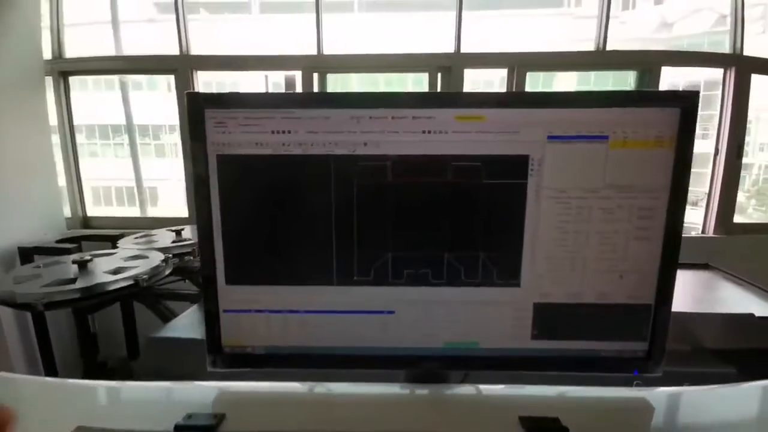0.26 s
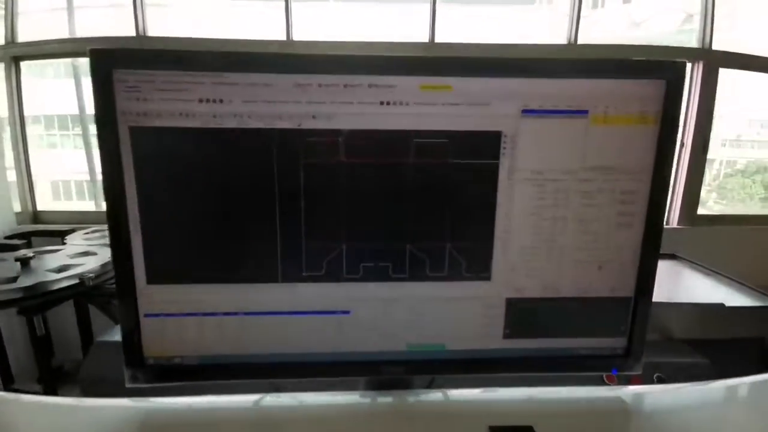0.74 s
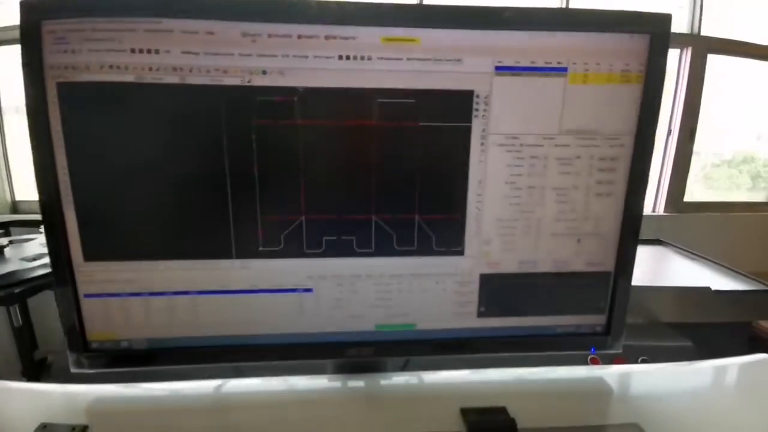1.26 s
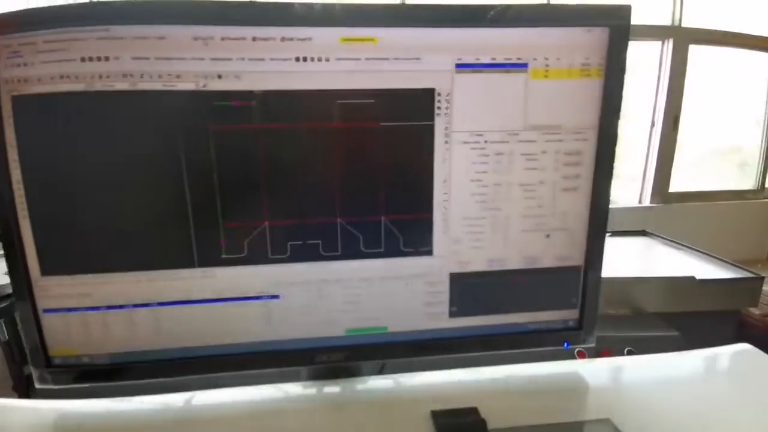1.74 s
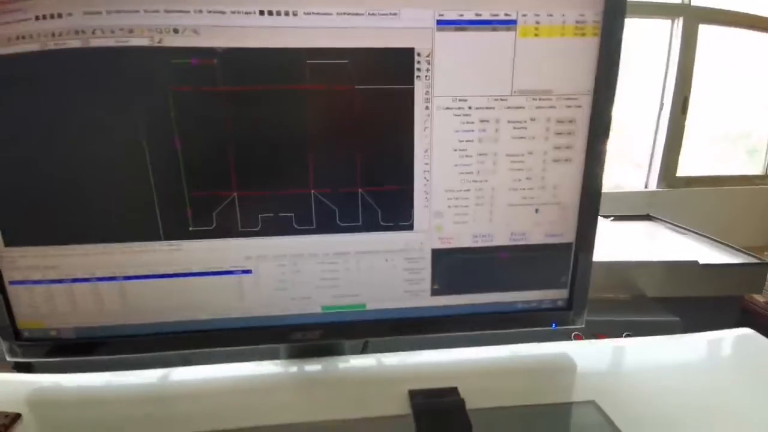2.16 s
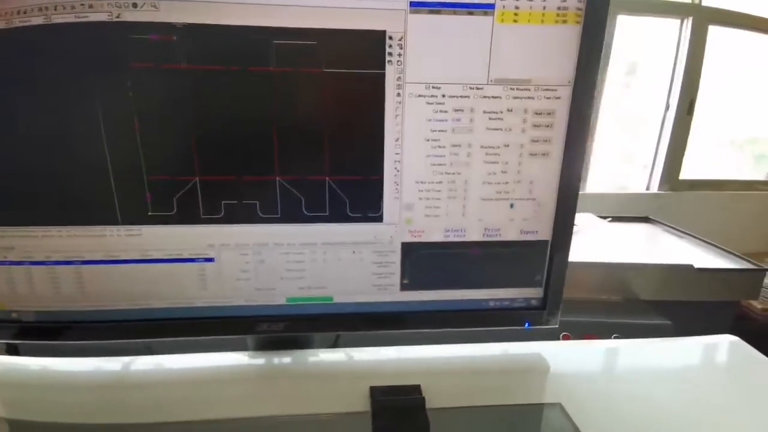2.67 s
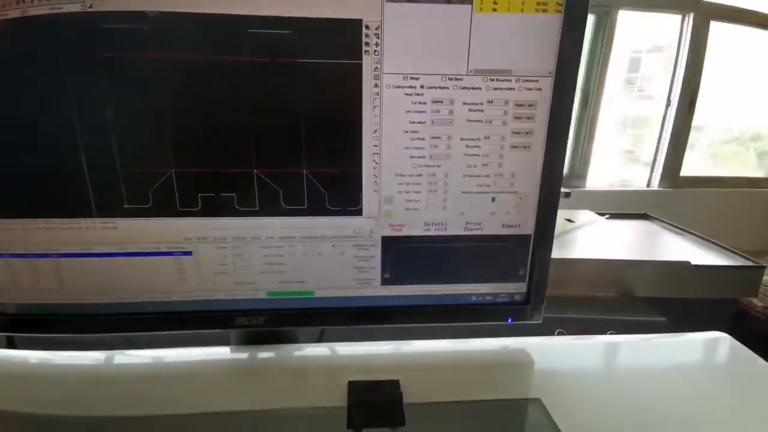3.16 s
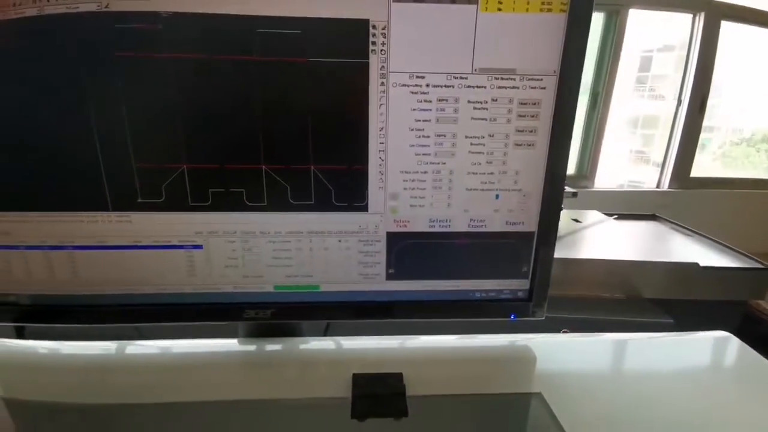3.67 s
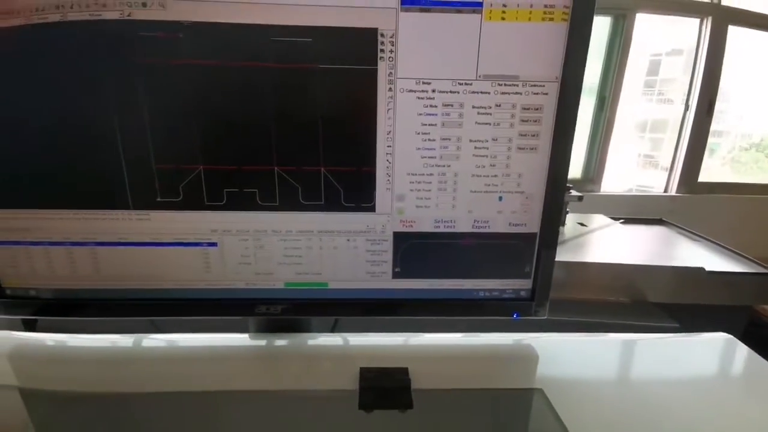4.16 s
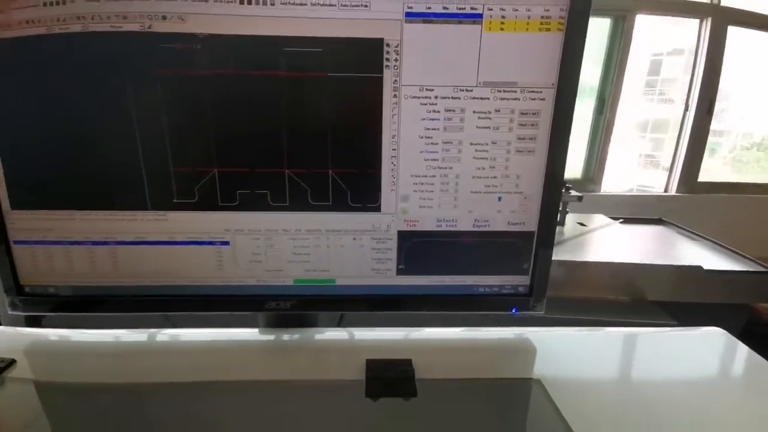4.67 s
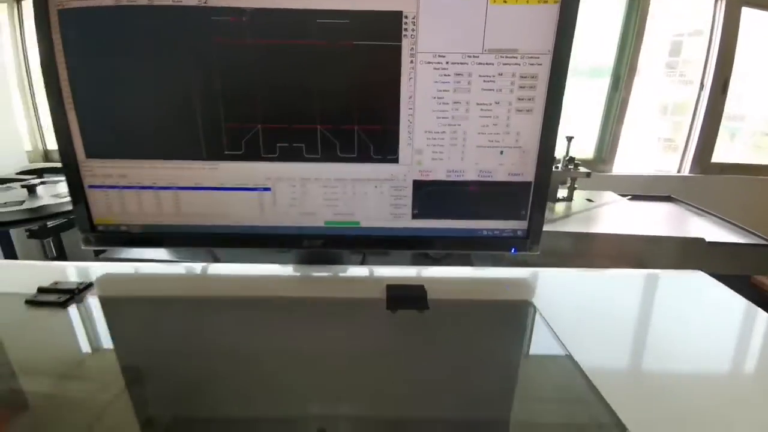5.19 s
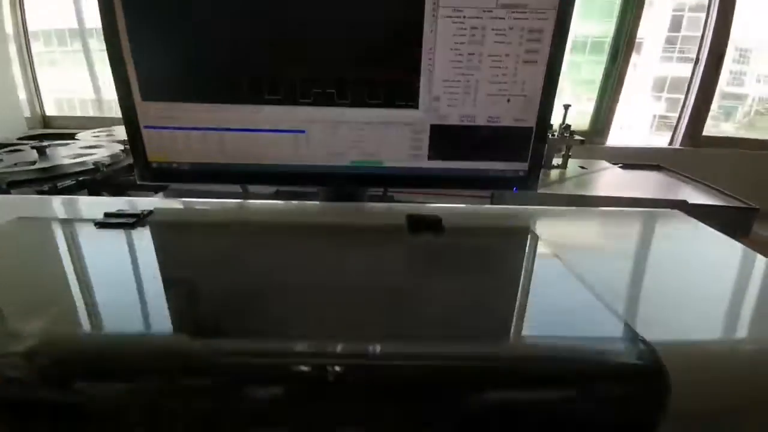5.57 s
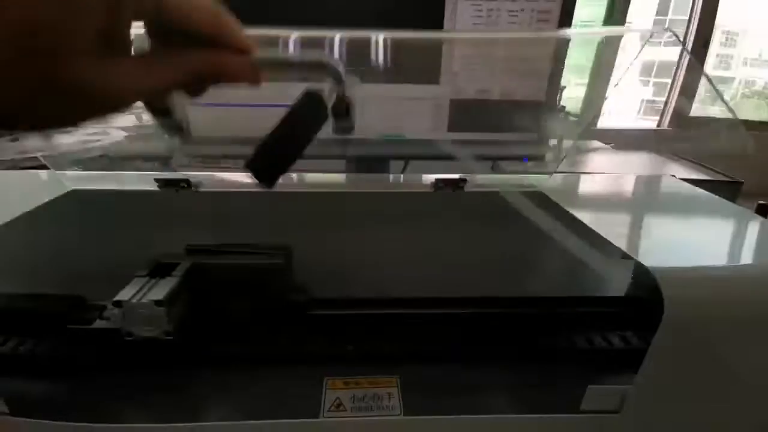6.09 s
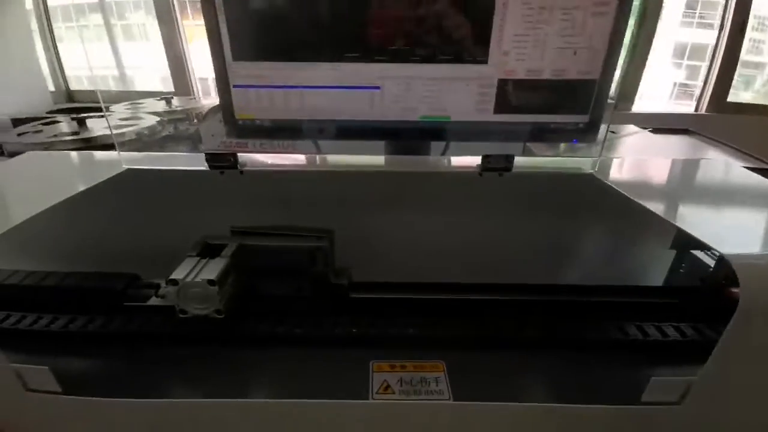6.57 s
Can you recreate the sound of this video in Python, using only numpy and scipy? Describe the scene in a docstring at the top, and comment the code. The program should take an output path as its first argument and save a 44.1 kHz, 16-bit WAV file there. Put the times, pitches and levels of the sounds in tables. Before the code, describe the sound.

An automatic metal bending machine hisses with bursts of compressed air, sharp clacks and thuds in an echoing workshop.

```python
"""An automatic rule bender cycles close by in a hard, echoing workshop.
Valves pop, cylinders thud and dies clack in turn: each blow is a strike and a short rattle that ring
the metal. Compressed air blows from a nozzle and exhausts and resonates in the housing. Servos whine
now and then, a cover bumps, and an uneven low rumble lies under the workshop's drone."""
import sys
import numpy as np
from scipy import signal
from scipy.fft import rfft, irfft
from scipy.io import wavfile
from scipy.ndimage import uniform_filter1d

SR = 44100
rng = np.random.default_rng(int(sys.argv[2]) if len(sys.argv) > 2 else 0)


def bounce(signal):
    """Save signal as a 16-bit WAV file at the path given by the first command-line argument."""
    frames = np.transpose(np.atleast_2d(signal))
    limited = np.clip(frames, -1, 1)
    pcm = np.round(limited * 32767).astype(np.int16)
    wavfile.write(sys.argv[1], SR, pcm)


N = 301203


def from_db(db):
    return 10 ** (np.asarray(db) / 20)


def unit_rms(x):
    return x / np.sqrt(np.mean(x ** 2) + 1e-20)


def gain_curve(rows):
    return from_db(np.interp(np.arange(N) / SR, *np.transpose(rows)))


def at_hz(points, hz):
    points_hz, values = np.transpose(points)
    return np.interp(np.log(hz), np.log(points_hz), values)


def drift(rate_hz):
    """Slow random wander, unit RMS."""
    r = np.exp(-80 * np.pi * rate_hz / SR)
    slow = signal.lfilter([1], [1, -2 * r, r * r], rng.standard_normal(N // 40 + 2002))[2000:]
    return np.interp(np.arange(N) / 40, np.arange(len(slow)), unit_rms(slow))


def coloured(x, spectrum):
    """Minimum-phase filter with the given spectrum."""
    size = 8192
    hz = np.arange(1, size // 2 + 2) * SR / size
    cepstrum = irfft(np.log(from_db(at_hz(spectrum, hz))))
    cepstrum[1:size // 2] *= 2
    cepstrum[size // 2 + 1:] = 0
    return signal.fftconvolve(x, irfft(np.exp(rfft(cepstrum))))[:len(x)]


def resonate(x, modes):
    """Parallel resonances, signs alternating."""
    out = 0
    for k, (hz, width_hz, db) in enumerate(modes):
        r = np.exp(-np.pi * width_hz / SR)
        poles = [1, -2 * r * np.cos(2 * np.pi * hz / SR), r * r]
        out = out + (-1) ** k * from_db(db) * signal.lfilter([1 - r, 0, r - 1], poles, x)
    return out


def turbulence(spectrum, flicker_db, rate_hz):
    """Coloured noise whose strength flickers."""
    noise = coloured(rng.standard_normal(N), spectrum)
    return unit_rms(noise * from_db(flicker_db * drift(rate_hz)))


def blows(hits, colour, modes, rise_s, decay_s, ring_db, strike_db, hall_ring_db, hold_s=0):
    """Metal parts meet in a strike and a short rattle, ring their modes and fill the hall."""
    near, hall_send, t = np.zeros(N + SR), np.zeros(N), np.arange(SR // 2) / SR
    envelope = np.minimum(t / rise_s, 1) * np.exp(-np.maximum(t - hold_s, 0) / decay_s)
    click = signal.unit_impulse(len(t), int(rise_s * SR))
    strike = from_db(strike_db) * np.sqrt(np.sum(envelope ** 2)) * click
    for start_s, db, tilt_db, hall_db, shift_percent in hits:
        rattle = envelope * rng.standard_normal(len(t))
        ring = resonate(rattle + strike, np.array(modes) * [1 + shift_percent / 100, 1, 1])
        direct = unit_rms(coloured(rattle, colour)) + from_db(ring_db) * unit_rms(ring)
        direct = coloured(direct, [(125, -3 * tilt_db), (8000, 3 * tilt_db)])
        peak = np.sqrt(2 * np.max(uniform_filter1d(direct ** 2, size=300)))
        direct *= from_db(db) / peak
        at = round(start_s * SR)
        near[at:at + len(t)] += direct
        hall_send[at] = from_db(hall_db) * np.sqrt(np.mean(direct ** 2))
    body = unit_rms(coloured(click, colour)) + from_db(hall_ring_db) * unit_rms(resonate(click, modes))
    tail = signal.fftconvolve(unit_rms(body), hall_echo())   # each part has its own echo
    return near[:N] + signal.fftconvolve(hall_send, tail)[:N]


# A part's blows (HITS). Each row: start in seconds, peak in dB, tilt in dB per octave,
# hall share in dB, pitch shift in percent.
# Its rattle spectrum (COLOUR). Each row: frequency in Hz, level in dB.
# Its resonances (MODES). Each row: frequency in Hz, width in Hz, gain in dB.
PRESS_HITS = [(0.5155, -29.5, 3, 4, 0.11), (2.879, -29.5, 0.5, -1, 1.4), (5.141, -25.5, 2.5, -5, 0.79)]
PRESS_COLOUR = [(71, -47), (120, -40), (241, 15), (572, -1), (676, 1), (1050, 2), (1360, 3), (1470, 6),
                (2650, -1), (4500, -8.5), (5850, -27), (9900, -120)]
PRESS_MODES = [(267, 26, 9.5), (309, 12, 10), (566, 26, 4.5), (821, 58, 6.5), (932, 43, 4), (1070, 34, 7),
               (1229, 28, 6.5), (1325, 35, 6.5), (2040, 65, 0)]


def press():
    """The press cylinder thuds home."""
    return blows(PRESS_HITS, PRESS_COLOUR, PRESS_MODES, rise_s=0.002, decay_s=0.028,
                 ring_db=7, strike_db=-2.5, hall_ring_db=-2.5, hold_s=0.022)


# Release blows. Rows as for the press.
RELEASE_HITS = [(0.7078, -22.5, 0.1, 0.22, 0.39), (1.2082, -42.5, 0.1, 0.6, 0.27),
                (3.0669, -26.5, 0.1, 0.56, 1.2), (5.3315, -25, 0.12, 3.2, -1.5)]
RELEASE_COLOUR = [(150, -23), (250, -1), (400, -8), (570, -14.5), (1500, -17), (2100, -9), (2900, 5),
                  (3300, -16), (5500, -20), (9000, -70)]
RELEASE_MODES = [(396, 65, -8.5), (2183, 85, 4.5), (2324, 75, -7.5), (2706, 50, 2.5), (2913, 55, 2)]


def release():
    """The press lets go with a bright clink."""
    return blows(RELEASE_HITS, RELEASE_COLOUR, RELEASE_MODES, rise_s=0.001485, decay_s=0.011,
                 ring_db=2.2, strike_db=2.5, hall_ring_db=0.78, hold_s=0.008)


# Die blows. Rows as for the press.
CUT_HITS = [(1.356, -23.5, 0.43, -4.5, -0.013), (3.6250, -24, 1.55, -4.5, -0.78),
            (6.1842, -20, 2.9, -7.5, 0.27)]
CUT_COLOUR = [(120, -36), (200, -6.5), (890, -1.5), (1690, -12), (2170, -12), (3090, -5), (3630, -1),
              (4450, -7), (4900, -15), (5300, -18), (7000, -14), (8660, -12), (9640, -50), (12600, -46),
              (14000, -35)]
CUT_MODES = [(377, 19, 0.5), (924, 15, 0.5), (2300, 80, -4.5), (2750, 70, -6), (3580, 134, 1),
             (3745, 110, -12), (4940, 80, -4), (5870, 100, -10), (7270, 160, -6), (8740, 280, -14)]


def cut():
    """The die shuts with a clack and a fainter, bright tick."""
    clack = blows(CUT_HITS, CUT_COLOUR, CUT_MODES, rise_s=0.0026, decay_s=0.0097,
                  ring_db=3, strike_db=-1.5, hall_ring_db=4)
    tick = blows([(start_s, db - 20.5, 0, -30, 0) for start_s, db, *_ in CUT_HITS],
                 colour=[(6000, -56), (9000, -6), (11000, -2), (14000, 2)], modes=[(10700, 600, 0)],
                 rise_s=0.002, decay_s=0.003, ring_db=-4.5, strike_db=-3, hall_ring_db=0)
    return clack + tick


# Valve pops. Rows as for the press.
VALVE_HITS = [(1.8485, -41.5, .1, -15, .1), (4.117, -41.5, .1, -6, .1), (6.492, -38.5, .1, -2, 0.088),
              (6.677, -37.5, .1, -23, .1)]
VALVE_COLOUR = [(24, -63), (40, 23), (196, 5), (283, 11), (483, -10), (949, -17), (1650, -31), (2500, 12),
                (3500, -5), (6500, 0), (9000, -50)]
VALVE_MODES = [(119, 60, 10.5), (993, 75, 7.8)]


def valve():
    """A valve switches with a short pop."""
    return blows(VALVE_HITS, VALVE_COLOUR, VALVE_MODES, rise_s=0.00091, decay_s=0.0015,
                 ring_db=-0.57, strike_db=5.1, hall_ring_db=9)


# Clamp blows. Rows as for the press.
CLAMP_HITS = [(2.015, -36, 0.091, -2.1, .1), (4.277, -39, 0.13, -1.4, .1)]
CLAMP_COLOUR = [(120, -65), (200, -3.5), (642, -7), (1030, 3), (1230, -1.5), (1930, -0.5), (2330, -5),
                (2960, -6), (4000, -27), (5200, -23), (8800, -120)]
CLAMP_MODES = [(310, 48, 1.5), (920, 104, 2.5), (1240, 33, -30), (2140, 18, 4.5)]


def clamp():
    """The clamp strikes softly and rattles."""
    return blows(CLAMP_HITS, CLAMP_COLOUR, CLAMP_MODES, rise_s=0.0044, decay_s=0.064,
                 ring_db=-0.9, strike_db=-8, hall_ring_db=-12)


# Feed blows. Rows as for the press.
FEED_HITS = [(2.275, -32, -4.5, -2.5, .1), (4.551, -33, 1, -3, .1)]
FEED_COLOUR = [(35, -30), (60, -5), (153, 8.5), (324, -7), (449, 9.5), (771, 12.5), (970, -2), (1160, -2),
               (1640, -3), (3000, -46), (3900, -11), (6600, -120)]
FEED_MODES = [(206, 49, 3.5), (428, 26, 12), (510, 77, -28), (1124, 38, 6), (1526, 60, 3)]


def feed():
    """The feed lands with a dull clunk."""
    return blows(FEED_HITS, FEED_COLOUR, FEED_MODES, rise_s=0.00278, decay_s=0.06,
                 ring_db=0.65, strike_db=0.8, hall_ring_db=4)


# Cover bump. Rows as for the press.
COVER_HITS = [(5.698, -28, 0.13, -11, .1)]
COVER_COLOUR = [(59, -47), (100, -16), (257, 1), (616, -26), (754, -17), (1260, -27), (1540, -38),
                (2500, -13), (3250, -50), (5500, -120)]
COVER_MODES = [(267, 2.75, 15), (210, 32, -2.5), (275, 5, -2), (760, 20, -13), (1230, 10, -7.5)]


def cover():
    """The lifted cover bumps and rings low."""
    return blows(COVER_HITS, COVER_COLOUR, COVER_MODES, rise_s=0.0056, decay_s=0.024,
                 ring_db=9.4, strike_db=9, hall_ring_db=-9)


# Panel jolts. Rows as for the press.
PANEL_HITS = [(1.362, -36.5, .1, -1, -7.5), (3.638, -40.5, .1, 1.5, 0), (6.215, -43.5, .1, 1.5, 0),
              (6.272, -42, 0.14, 0.2, 2)]
PANEL_COLOUR = [(200, -40), (350, -10), (450, -1), (600, -24), (2000, -81)]
PANEL_MODES = [(364, 5, 3.2), (421.4, 29, 9.4)]


def panel():
    """A panel hums after each cut."""
    return blows(PANEL_HITS, PANEL_COLOUR, PANEL_MODES, rise_s=0.00622, decay_s=0.038,
                 ring_db=6.1, strike_db=0.84, hall_ring_db=0.1)


# Taps. Rows as for the press.
TAP_HITS = [(5.8425, -30.5, 0.1, -3, .1), (6.0032, -33, 2.5, -6, .1)]
TAP_COLOUR = [(200, -27), (420, -5), (700, -13), (1800, -4), (2750, -25), (3600, -1), (6000, -31)]
TAP_MODES = [(407, 29, 0), (2710, 120, 6), (2830, 80, -4)]


def taps():
    """Two light taps on metal."""
    return blows(TAP_HITS, TAP_COLOUR, TAP_MODES, rise_s=0.00104, decay_s=0.021,
                 ring_db=3.8, strike_db=1.3, hall_ring_db=0)


# Air blasts. Each row: opening, shutting and rise time in seconds, hiss at opening and at shutting
# in dB, tight-jet share from 0 to 1, exhaust and sizzle in dB relative to the hiss.
BLASTS = [(-.1, 0.367, .01, -39, -41.5, 1, -12.5, -20), (0.34, 0.52, 0.065, -34.5, -37, 0.95, -14.5, -30),
          (0.544, 0.674, 0.024, -43.5, -41, 0.3, -2, -33), (1.183, 1.27, 0.015, -55.5, -58, 0.7, 0, -27),
          (1.319, 1.326, .002, -47, -49, 0.4, -7, -20), (1.363, 1.406, .01, -35, -45, 0.3, -1.5, -34),
          (1.835, 2.145, 0.033, -41.5, -37.5, 0.76, -4.5, -13.5),
          (2.206, 2.8, 0.096, -40, -35, 0.56, -6.5, -20.5),
          (2.854, 3.04, 0.027, -40, -34.5, 0.5, -6.5, -13), (3.088, 3.633, 0.095, -37, -35, 0.19, -9, -28),
          (3.683, 4.087, 0.053, -42, -37.5, 0.32, -10, -25.5),
          (4.105, 4.442, .015, -40, -36.5, 0.52, -7.5, -16.5),
          (4.516, 4.82, 0.013, -37.5, -33, 0.16, -7.5, -19),
          (4.836, 5.11, 0.037, -36, -31.5, 0.6, -6.5, -18),
          (5.15, 5.298, 0.032, -36.5, -35.5, 0.64, -3, -12.5),
          (5.576, 5.854, 0.1, -41, -33.5, 0.24, -11.5, -25),
          (5.908, 6.146, 0.041, -39.5, -34.5, 0.22, -11, -23),
          (6.256, 6.424, 0.068, -44, -36.5, 0.15, -11, -25), (6.45, 6.606, .02, -43, -42.5, 0.08, -9, -44),
          (6.67, 7, 0.018, -35.5, -43, 0.7, -4, -11)]
# Jet spectra. Each row: frequency in Hz, level in dB.
BROAD_JET = [(2060, -52.5), (3500, -13.5), (3670, -8.5), (3980, -9.5), (4320, -6.5), (5650, 0.5),
             (6130, 0.5), (6810, 2.5), (7720, -2), (8370, -22), (9530, -18.5), (9900, -29), (11000, -31),
             (14300, -46), (22000, -120)]
TIGHT_JET = [(2060, -71), (3500, -7.5), (3690, -31), (3780, -20), (4020, -12), (4920, -19), (5210, -15.5),
             (5730, -4.5), (6620, -2), (7290, 3), (8780, -10), (10000, -34), (11000, -30.5), (14300, -31),
             (22000, -120)]
EXHAUST = [(710, -55.5), (1200, -5.5), (1430, -11.5), (1760, -5.5), (1900, 0.5), (2550, 6), (2990, 7.5),
           (3670, 1.5), (3890, 2), (4310, -2.5), (5000, 0), (6500, -50), (11000, -120)]
SIZZLE = [(5290, -101), (9000, 4.5), (10000, -4.5), (11800, -5.5), (13400, -4), (14000, -64)]
# Jet whistles. Each row: start and end in seconds, level in dB.
WHISTLES = [(.38, .55, -61), (1.86, 2.15, -53), (5.15, 5.32, -55), (6.69, 7, -39)]
# Whistle and housing resonances. Each row: frequency in Hz, width in Hz, gain in dB.
WHISTLE_MODES = [(6740, 62, 2), (7530, 60, 0), (7470, 40, -26)]
HOUSING_MODES = [(2103, 36, -8), (2390, 34, -45), (2980, 57, -8.5), (3660, 22, -11.5), (3910, 63, -12),
                 (5150, 42, -9), (5800, 60, -11), (6530, 36, -16), (6980, 49, -8), (7550, 28, -25)]


def air():
    """Nozzle hiss, duller exhaust, sizzle and whistles, all ringing fitfully in the hollow housing."""
    t, power = np.arange(N) / SR, np.zeros((4, N))
    fade_db_per_s = 56.5, 34.5, 115   # hiss, exhaust, sizzle
    for open_s, shut_s, rise_s, open_db, shut_db, tight_share, exhaust_db, sizzle_db in BLASTS:
        opening = np.clip((t - open_s) / rise_s, 0, 1)
        flow = opening * from_db(np.interp(t, [open_s, shut_s], [open_db, shut_db]))
        hiss, exhaust, sizzle = flow * from_db(-np.outer(fade_db_per_s, np.maximum(t - shut_s, 0)))
        power += [(1 - tight_share) * hiss ** 2, tight_share * hiss ** 2,
                  (from_db(exhaust_db) * exhaust) ** 2, (from_db(sizzle_db) * sizzle) ** 2]
    broad, tight, exhaust, sizzle = np.sqrt(power)
    whistle = sum(from_db(db) * np.clip(np.minimum(t - start_s, end_s - t) / 0.02, 0, 1)
                  for start_s, end_s, db in WHISTLES)
    jets = (whistle * unit_rms(resonate(rng.standard_normal(N), WHISTLE_MODES))
            + broad * turbulence(BROAD_JET, flicker_db=0.5, rate_hz=17)
            + tight * turbulence(TIGHT_JET, flicker_db=1.8, rate_hz=11)
            + exhaust * turbulence(EXHAUST, flicker_db=1.5, rate_hz=12.6)
            + sizzle * turbulence(SIZZLE, flicker_db=2, rate_hz=23))
    housing = sum(from_db(4.5 * drift(rate_hz=11)) * resonate(jets, [mode]) for mode in HOUSING_MODES)
    return jets + housing


# Servo moves. Each row: start and stop in seconds, pitch and width in Hz,
# level at start and at stop in dB, half-pitch partial in dB.
SERVO_MOVES = [(-.02, 0.503, 1730, 150, -70, -66, -59), (2.356, 2.838, 1904, 160, -48.5, -53, -59),
               (2.75, 2.803, 2795, 6, -43, -37, -73), (4.105, 4.452, 2810, 230, -48.5, -45.5, -59),
               (4.628, 4.872, 3033, 3, -36.5, -43, -54), (6.685, 7, 2440, 320, -57, -60, -53.5)]


def servo():
    """A running drive whines: a thin, rough tone and a partial an octave below."""
    t, out = np.arange(N) / SR, 0
    for start_s, stop_s, hz, width_hz, start_db, stop_db, half_db in SERVO_MOVES:
        running = np.clip(np.minimum(t - start_s, stop_s - t) / 0.028, 0, 1)
        rough = drift(width_hz / 2) + 1j * drift(width_hz / 2) + 20 / width_hz   # narrow: nearly pure
        tone = unit_rms((rough * np.exp(2j * np.pi * hz * t)).real)
        half_tone = unit_rms((rough * np.exp(1j * np.pi * hz * t)).real)
        db = np.interp(t, [start_s, stop_s], [start_db, stop_db])
        out = out + running * (from_db(db) * tone + from_db(half_db) * half_tone)
    return out


# Rumble and drone spectra. Each row: frequency in Hz, level in dB.
RUMBLE = [(15, -60), (25, -12), (40, 6.5), (65, 6.5), (100, 5), (131, 4), (160, 1), (260, -1), (340, -4),
          (570, -99.5)]
DRONE = [(88, -21), (150, 1), (354, -4.5), (426, -1.5), (563, -5.5), (916, 0), (1070, -3), (1540, -5.5),
         (2140, -1.5), (2400, -2.5), (3120, -22), (5280, -120)]
# Their swells. Each row: time in seconds, level in dB.
RUMBLE_LEVEL = [(0.0, -47.5), (0.53, -61.5), (0.68, -48), (1.56, -54), (1.67, -49.5), (2.07, -58.5),
                (2.38, -44.5), (2.74, -60.5), (2.91, -54.5), (4.03, -57.5), (4.5, -65), (4.62, -45),
                (4.8, -42), (5.1, -49), (5.32, -51.5), (6.03, -46), (6.07, -52), (6.62, -58), (6.7, -60),
                (6.83, -79)]
DRONE_LEVEL = [(0, -48.5), (.46, -56), (.66, -43.5), (.85, -51), (1.8, -56), (2, -52.5), (2.4, -53),
               (2.76, -53), (3.06, -45), (3.45, -59.5), (3.9, -57.5), (4.4, -61.5), (4.6, -46.5),
               (4.85, -42), (5.1, -46), (5.35, -44), (5.75, -51.5), (6.2, -57), (6.65, -58), (6.7, -56),
               (6.83, -60)]


def background():
    """An uneven low rumble, like microphone handling, under the workshop's drone."""
    rumble = gain_curve(RUMBLE_LEVEL) * turbulence(RUMBLE, flicker_db=-0.5, rate_hz=51)
    drone = gain_curve(DRONE_LEVEL) * turbulence(DRONE, flicker_db=1.5, rate_hz=11.2)
    return rumble + drone


# Hall reverberation. Each row: frequency in Hz, time to fall 60 dB in seconds.
HALL_T60 = [(100, 1.0), (400, 1.0), (1500, 1), (4000, 1), (10000, 0.73)]


def hall_echo():
    """Dense reflections as decaying octave bands of noise; unit energy."""
    t, echo = np.arange(SR) / SR, 0
    for low_hz in 44 * 2. ** np.arange(9):
        band = signal.butter(2, [low_hz, min(2 * low_hz, 0.45 * SR)], "band", fs=SR, output="sos")
        t60_s = at_hz(HALL_T60, low_hz * np.sqrt(2))
        echo = echo + signal.sosfilt(band, rng.standard_normal(SR)) * from_db(-60 * t / t60_s)
    echo *= np.minimum(t / 0.0017, 1)   # reflections build up
    return echo / np.sqrt(np.sum(echo ** 2))


def scene():
    """Bender and background, the same in both channels."""
    mechanism = press() + release() + cut() + valve() + clamp() + feed() + cover() + panel() + taps()
    return np.tile(mechanism + air() + servo() + background(), (2, 1))


def record(dry):
    """The microphone adds a faint hiss; the top is cut steeply."""
    hiss_db, stopband_hz = -93, 14150
    lowpass = signal.cheby2(16, 70, stopband_hz, fs=SR, output="sos")
    return signal.sosfilt(lowpass, dry + from_db(hiss_db) * rng.standard_normal(N))


dry = scene()
out = record(dry)
bounce(out)
```